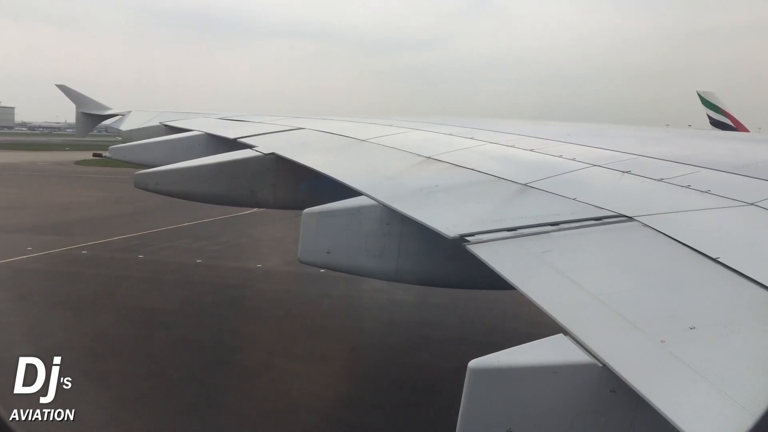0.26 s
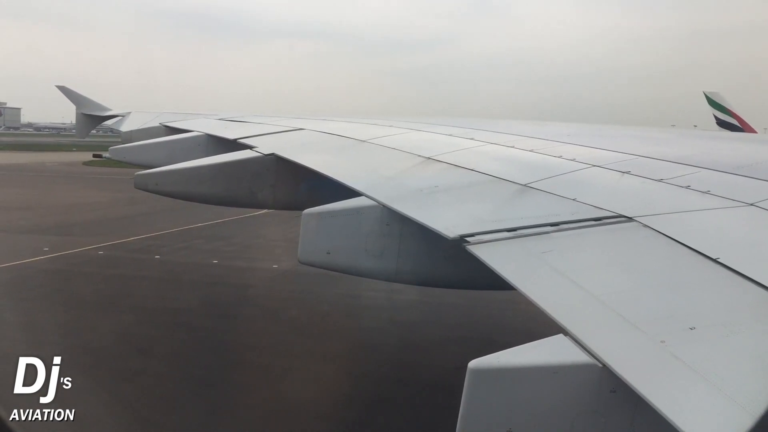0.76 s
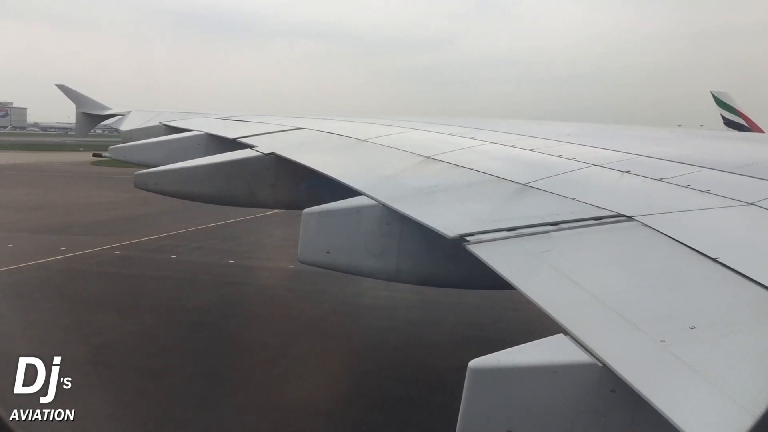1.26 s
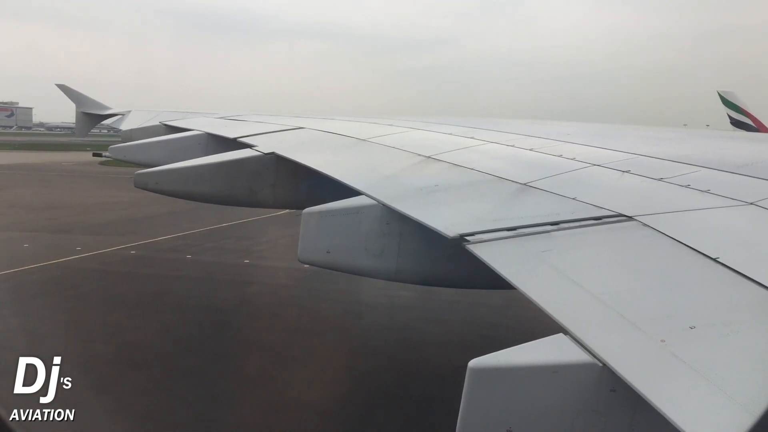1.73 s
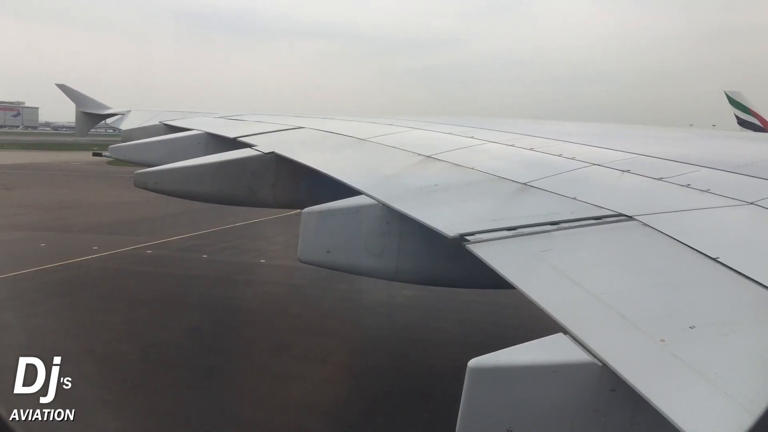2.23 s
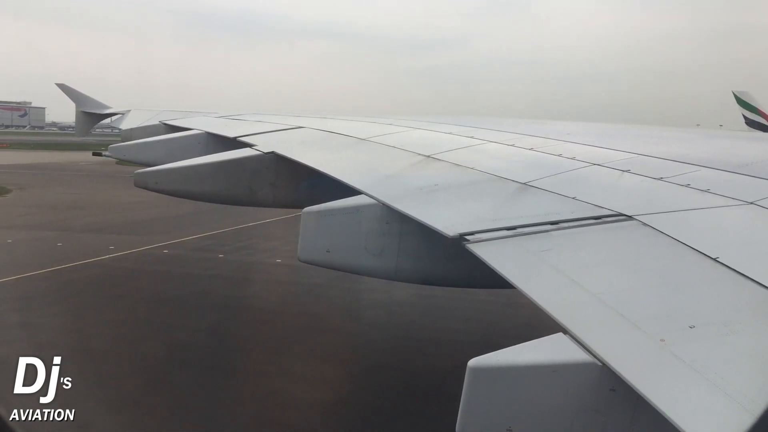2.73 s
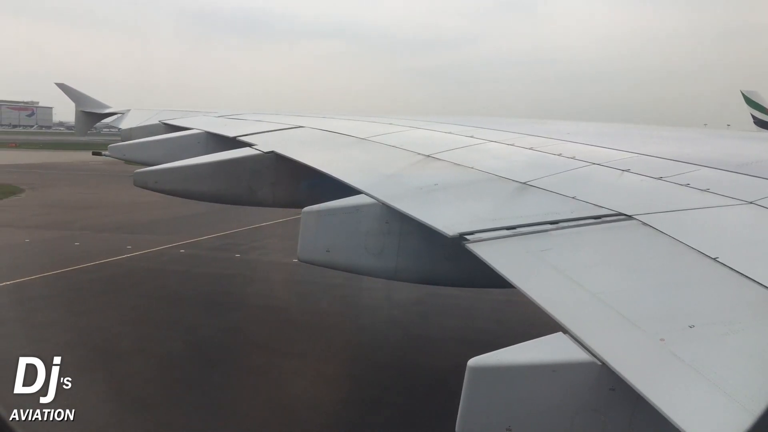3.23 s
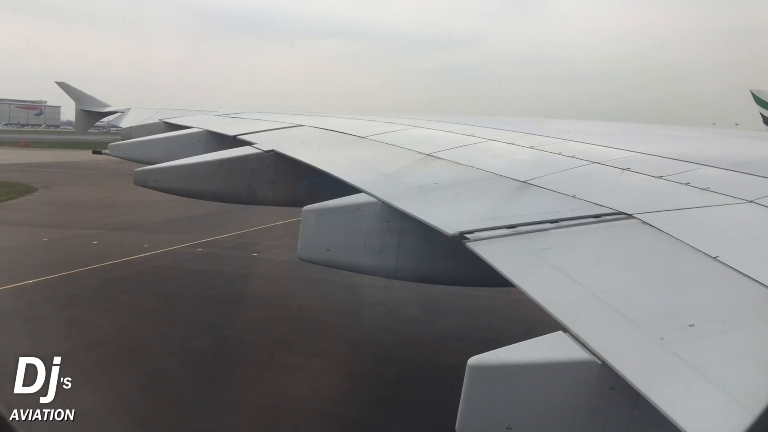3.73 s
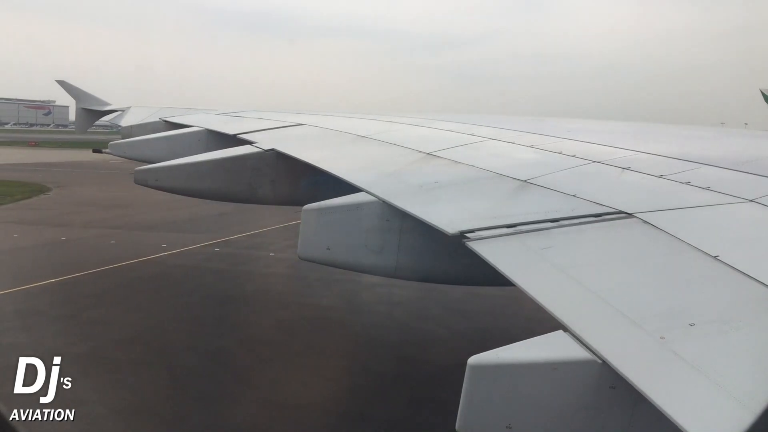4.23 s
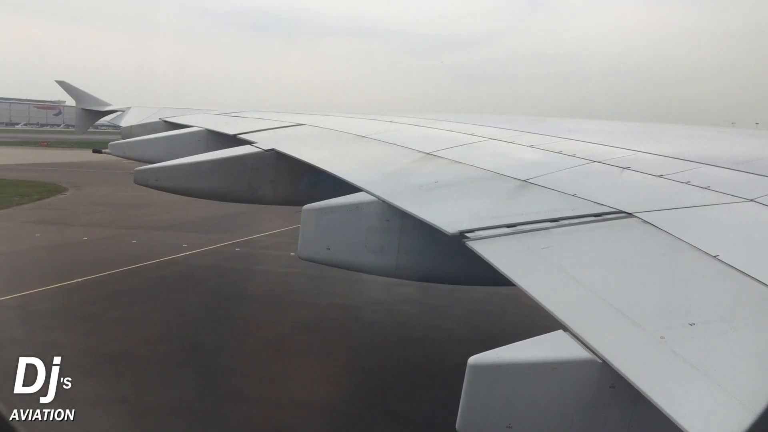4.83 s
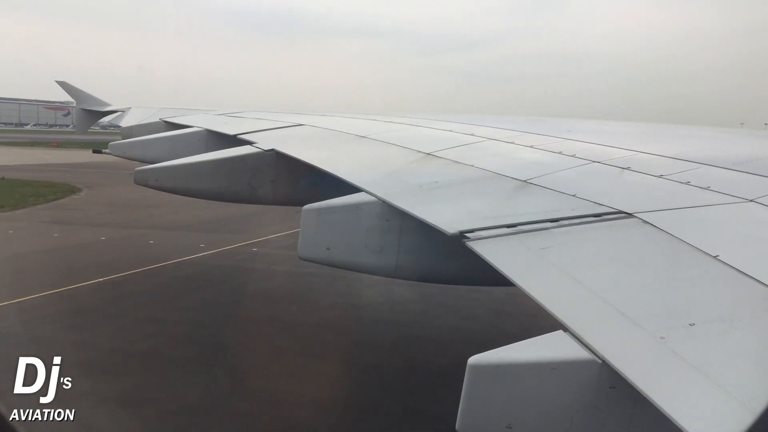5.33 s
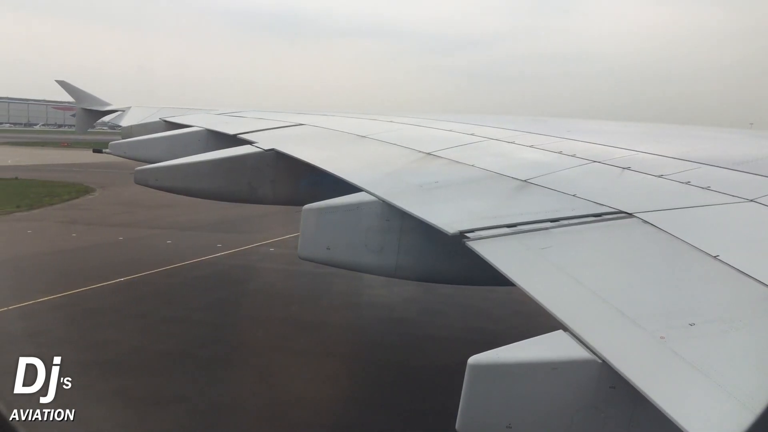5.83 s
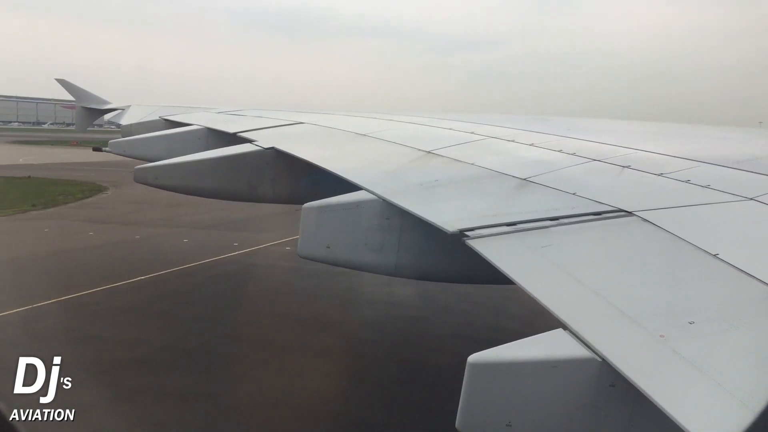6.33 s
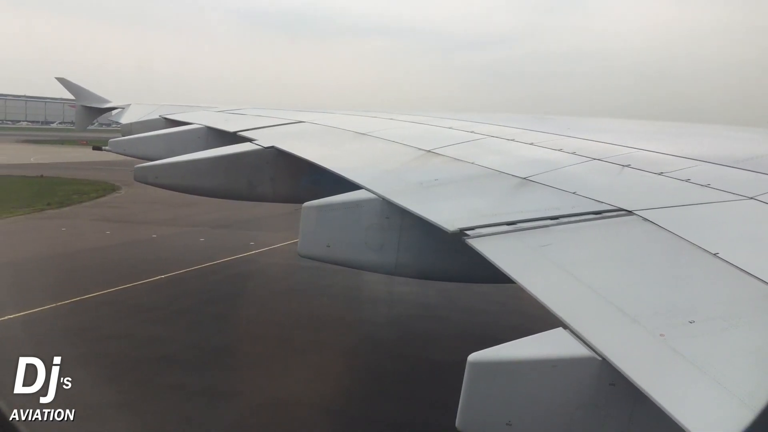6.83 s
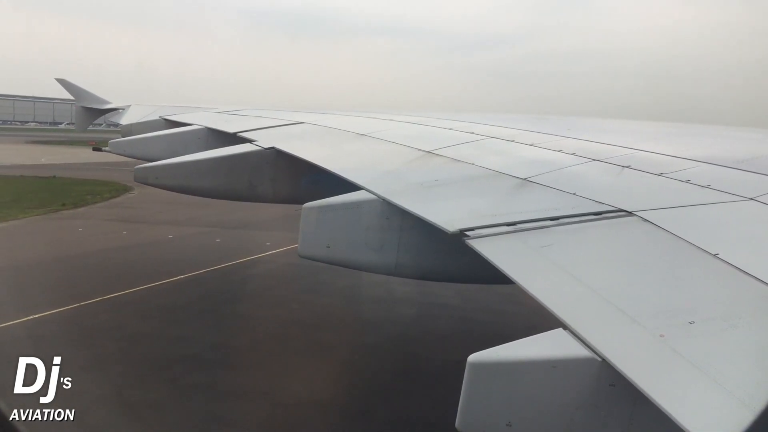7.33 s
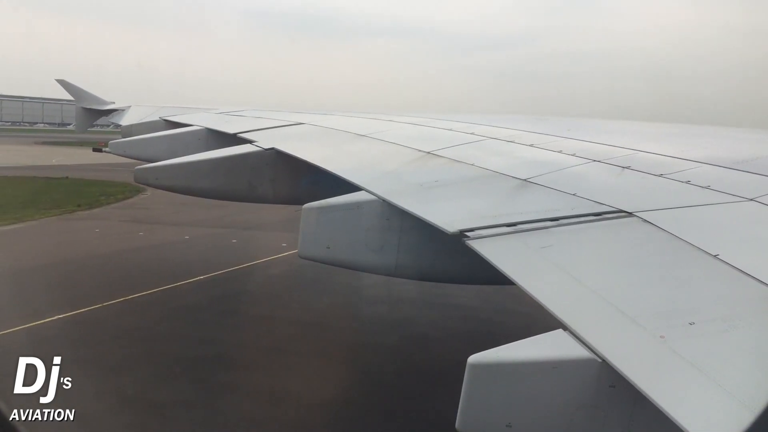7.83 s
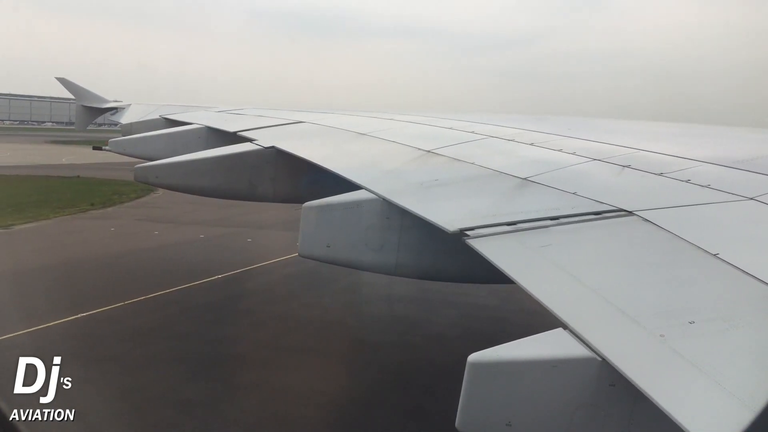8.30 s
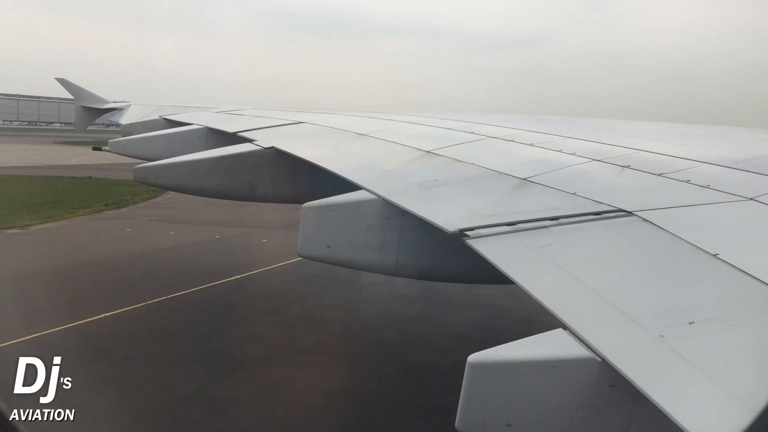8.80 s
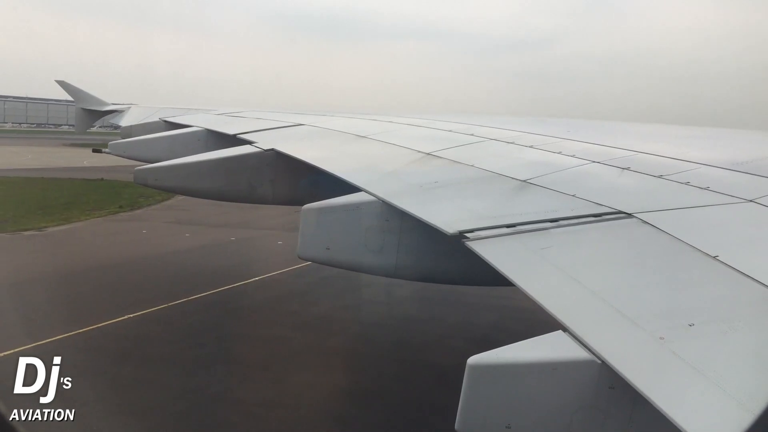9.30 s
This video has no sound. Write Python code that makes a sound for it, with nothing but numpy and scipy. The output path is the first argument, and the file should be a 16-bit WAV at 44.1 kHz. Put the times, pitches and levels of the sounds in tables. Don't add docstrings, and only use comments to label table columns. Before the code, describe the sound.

A continuous airliner cabin bed during taxi: uneven low rumble, soft broadband air rush, faint steady whines with a pump tone coming and going. An early soft bump and close plastic snap give way to sparse tiny ticks. Later one dull, weighty double thud shakes the floor and trim, a faint distant turbine whine climbs, and crackly fumbling of cloth and plastic happens right by the slightly hissy microphone.

```python
import sys
import numpy as np
from scipy import signal
from scipy.fft import rfft, irfft, next_fast_len
from scipy.io import wavfile
from scipy.ndimage import uniform_filter1d, map_coordinates

SR = 44100
rng = np.random.default_rng(int(sys.argv[2]) if len(sys.argv) > 2 else 0)


def master_out(mix):
    frames = np.transpose(np.atleast_2d(mix))
    ceiling = np.clip(frames, -1, 1)
    pcm = np.round(ceiling * 32767).astype(np.int16)
    wavfile.write(sys.argv[1], SR, pcm)


def magnitude_from_level(level_db):
    exponent = np.asarray(level_db, float) / 20
    return 10 ** exponent


N = 421596
T_S = np.arange(N) / SR

# (time [s], level [dB])
ROAD = [(0, 7), (1.3, 7), (2.4, 3.5), (3.2, 3), (3.7, 1.5), (4.4, 1.5), (5.3, -1), (6.2, -0.5), (7.3, -0.5),
        (8.3, -2), (9.56, -2)]


def unit(x):
    return x / np.sqrt(np.mean(x ** 2) + 1e-20)


def curve(rows):
    s, db = np.transpose(rows)
    return np.interp(T_S, s, db)


def wobble(knots_per_s):
    knots = rng.standard_normal(int(N * knots_per_s / SR) + 4)
    return map_coordinates(knots, [np.arange(N) * knots_per_s / SR])


def noise(gain, size=N):
    m = next_fast_len(size)
    spectrum = rfft(rng.standard_normal(m)) * gain(np.fft.rfftfreq(m, 1 / SR))
    return unit(irfft(spectrum, m)[:size])


def shaped(points):
    f, db = np.transpose(points)
    return lambda hz: magnitude_from_level(np.interp(np.log(hz + 1), np.log(f), db, -120, -120))


def peaked(modes):
    return lambda hz: np.sqrt(sum(magnitude_from_level(2 * db) / (1 + (2 * (hz - c) / w) ** 2) ** 2 for c, w, db in modes))


def rippled(colour, spacing_hz, depth_db):
    knots = rng.standard_normal(int(SR / 2 / spacing_hz) + 4)
    return lambda hz: colour(hz) * magnitude_from_level(depth_db * map_coordinates(knots, [hz / spacing_hz]))


def evened(x):
    padded = np.pad(x, (0, next_fast_len(N + SR) - N), 'reflect')
    envelope = np.abs(signal.hilbert(padded)[:N])
    return unit(x / (envelope + 0.46) ** 0.78)


def patchy(x, depth_db):
    z = signal.stft(np.pad(x, (0, SR // 10), 'reflect'), nperseg=512, boundary='even')[2]
    field = uniform_filter1d(rng.standard_normal(z.shape), size=6, axis=0)
    field = uniform_filter1d(field, size=30, axis=1)
    return signal.istft(z * magnitude_from_level(depth_db * unit(field)), nperseg=512)[1][:N]


def spells(rows, rest_db):
    edge_s = .06

    def on(s):
        return np.clip((T_S - s) / edge_s + .5, 0, 1)

    return rest_db + sum((db - rest_db) * (on(s) - on(s + length_s)) for s, length_s, db in rows)


def sine(hz):
    return np.sin(2 * np.pi * np.cumsum(hz) / SR)


def add(out, s, x):
    out[round(s * SR):][:len(x)] += x


def electronics():
    # (frequency [Hz], density [dB per Hz])
    hiss_colour = [(5000, -37), (6500, -11), (7900, -8), (8100, 0.5), (9800, 0), (10700, -5.5), (11400, -1),
                   (12600, 0), (13800, -3), (15100, -2.5), (15700, -2.5), (15750, 6)]
    orders = [50, 56, 57, 58, 60, 62, 63, 68, 70, 71, 74, 75, 77, 78, 79, 81]
    strong_db = {59: -95, 61: -98, 67: -100, 69: -97, 72: -98, 80: -101}
    hiss_db, buzz_hz, weak_db, scatter_db = -82.5, 192.81, -104, 2.7

    comb_db = {k: weak_db + scatter_db * rng.standard_normal() for k in orders} | strong_db
    buzz = sum(magnitude_from_level(db) * np.sin(2 * np.pi * (k * buzz_hz * T_S + rng.random())) for k, db in comb_db.items())
    hiss = magnitude_from_level(hiss_db + .4 * wobble(3.6)) * noise(shaped(hiss_colour))
    return hiss + buzz * magnitude_from_level(4 + wobble(2))


def distant():
    # (start [s], length [s], level [dB rms])
    sing = [
        (0.2, 3.6, -98),
        (4.1, .4, -95),
        (5.2, .3, -96),
        (5.75, .45, -90),
        (7.7, .9, -96),
        (9.25, .3, -94),
    ]
    start_s, end_s, glide_db, sing_hz = 7.15, 8.45, -95, 6245

    glide_hz = np.interp(T_S, (start_s, end_s), (4640, 5400))
    glide_level_db = spells([(start_s, end_s - start_s, glide_db)], -130) + 3 * wobble(7)
    glide = magnitude_from_level(glide_level_db) * sine(glide_hz)
    return glide + magnitude_from_level(spells(sing, -110) + 3) * sine(sing_hz + 6 * wobble(6))


def machinery():
    # (time [s], level [dB rms])
    spool = [(0, -62), (.4, -58), (1.2, -60), (3.2, -57.5), (3.5, -54.5), (4.8, -54), (6.7, -55),
             (7.3, -56.5), (8.5, -59.5), (9.56, -59.5)]
    # (start [s], length [s], level [dB rms])
    pump = [(.2, .5, -68), (0.947, 0.39, -66.5), (1.6, 0.49, -66.5), (2.85, 0.55, -63.5),
            (3.703, 1.03, -66.5), (5.1, 0.42, -69.5), (5.9, .4, -70), (6.5, .3, -70), (7.2, .4, -76),
            (7.85, 0.44, -65.5), (8.695, 0.44, -68), (9.3, .4, -67)]
    # (start [s], length [s], level [dB rms])
    whistle = [(1.15, 0.65, -86), (1.75, .5, -85.5), (3.3, .4, -88), (4.56, .12, -83), (4.85, 0.22, -82),
               (5.12, .18, -80), (6.15, .45, -86), (8.1, .35, -88), (8.75, .55, -86), (9.45, .2, -85)]
    tone_hz = [799.7, 1062, 3222.5, 4527.5]
    whine_hz = [400, 818, 1005, 1118, 1197.5, 1225, 1263.5, 1330, 1405, 1537, 1599, 1828, 2001, 2263, 3001,
                3090, 3158]
    # (level [dB rms], width [Hz])
    whines = [(-68.5, 12), (-71, 6), (-70.5, 12), (-67, 5), (-63, 2.8), (-69, 15), (-62, 3.4), (-74, 5),
              (-61, 14), (-59.5, 6), (-68.5, 6), (-69, 6.6), (-67.5, 19.5), (-71, 14.05), (-84, 12),
              (-74, 6), (-72.5, 6.6)]
    converter_db, converter_follows_spool, pump_rest_db, whistle_rest_db = -66, 0.27, -77.5, -95

    out = np.zeros(N)
    spool_db = curve(spool)
    converter_level_db = converter_db + converter_follows_spool * (spool_db - spool_db.mean()) + 1.1 * wobble(3)
    levels_db = converter_level_db, spool_db, spells(pump, pump_rest_db), spells(whistle, whistle_rest_db)
    for hz, db in zip(tone_hz, levels_db):
        drift = 1 + 1.3e-3 * wobble(9)
        out += np.sqrt(2) * magnitude_from_level(db + 1.5 + 0.44 * wobble(8)) * sine(hz * drift)
    for hz, (db, width_hz) in zip(whine_hz, whines):
        steady = sine(hz + 0.402 * width_hz * wobble(5))
        rough = noise(peaked([(hz, width_hz, 0)]))
        out += magnitude_from_level(db + 0.85 * wobble(3.1)) * (0.85 * steady + 0.78 * rough)
    return out


def cloth():
    # (time [s], peak [dB], dullness, low over high [dB], t60 [s])
    brushes = [(0.4155, -40, 8, 0.045), (0.42, -46, 18, 0.04), (0.6833, -57.5, 2, 0.052),
               (1.669, -57, 20, 0.08), (1.678, -64, -9, 0.03), (1.687, -60, 2, 0.06),
               (1.8054, -64, 5, 0.08), (3.7494, -70, -5, 0.07), (4.4248, -62, 18, 0.07),
               (4.635, -71, -16, 0.12), (5.0868, -60, -5, 0.07), (5.091, -50, -6, 0.085),
               (5.5094, -63, 14, 0.07), (7.5717, -62, 7, 0.076), (7.581, -68, 3, 0.07),
               (8.929, -58, 8, 0.06), (8.9435, -41.5, 6, 0.055), (8.964, -51, 2, 0.07),
               (9.012, -62, 22, 0.049), (9.0606, -62, -1, 0.09), (9.1, -56, 4, 0.066),
               (9.131, -53, 20, 0.12), (9.142, -43, 4, 0.08), (9.162, -48, 2, 0.06), (9.174, -43, 6, 0.07),
               (9.216, -61, 4, 0.06), (9.3506, -63, 3, 0.06), (9.411, -63, 16, 0.07)]
    bands = [[(1200, -36), (2200, -0.5), (2600, 4), (4000, -7), (5500, -2.5), (6800, -8.5), (7800, -36)],
             [(6300, -20.5), (7500, -8.5), (9500, -4), (10800, -6.5), (11800, -54)],
             [(10300, -33), (11400, 2), (13500, -5), (14800, -7.5), (15700, -5), (16000, -48.5)]]

    out, t = np.zeros(N + SR), np.arange(SR // 4) / SR
    for s, db, dull_db, t60_s in brushes:
        mix_db = dull_db / 2, -.4 * dull_db + 0.5, -dull_db / 2
        puff = sum(magnitude_from_level(level_db) * noise(rippled(shaped(band), 450, depth_db=4.5), size=len(t))
                   for level_db, band in zip(mix_db, bands))
        slips = rng.standard_normal(len(t) // 90 + 3)
        grain = magnitude_from_level(2.8 * map_coordinates(slips, [np.arange(len(t)) / 90]))
        fade = magnitude_from_level(-60 * t / (0.7 * t60_s)) + magnitude_from_level(-12 - 60 * t / (2.2 * t60_s))
        attack = (1 - np.exp(-t / 0.0021)) ** 2
        add(out, s - .004, magnitude_from_level(db - 9.5) * puff * grain * fade * attack)
    return out[:N]


def plastic():
    # (time [s], level [dB],
    # frequency [Hz], width [Hz])
    ticks = [(.418, -46, 2250, 1200), (.75, -71, 6000, 2500), (.95, -62, 4500, 2000),
             (1.666, -39, 1450, 250), (1.669, -37, 1620, 300), (1.674, -40, 1700, 200),
             (2.02, -71, 11000, 6000), (2.02, -65, 5500, 2500), (4.426, -60, 4520, 300),
             (5.09, -66, 5200, 200), (5.093, -68, 6350, 300), (7.569, -65, 6200, 300),
             (6.607, -63, 5000, 2500), (7.571, -65, 9200, 500), (7.573, -69, 10400, 500),
             (7.57, -71, 12600, 1200), (3.752, -72, 11400, 300), (7.575, -68, 5400, 300),
             (8.4, -57, 3800, 500), (8.963, -59, 7100, 400), (9.128, -48, 3300, 1200),
             (9.14, -57, 15550, 350), (9.17, -55, 5350, 346), (9.172, -60, 15550, 350),
             (9.01, -62, 4300, 900), (8.943, -56, 5900, 600), (5.081, -64, 11500, 3000),
             (5.088, -61, 5000, 3000), (4.422, -68, 5800, 2000), (9.19, -63, 5000, 3000),
             (9.407, -61, 4200, 600)]
    # (time [s], level [dB], frequency [Hz], width [Hz])
    creaks = [(1.645, -75, 11000, 5000), (3.63, -71, 5500, 3000), (8.985, -66, 5000, 4000),
              (9.07, -70, 6000, 6000), (1.635, -66, 4500, 2000), (7.31, -74, 6000, 150),
              (7.78, -82, 11000, 200)]
    # (time [s], level [dB], frequency [Hz], width [Hz])
    snaps = [(.414, -52, 9000, 2500), (.418, -50, 12000, 2500), (.415, -47, 5000, 3000),
             (.419, -38, 2100, 900), (.432, -56, 5200, 1500), (.432, -60, 9000, 1500),
             (1.655, -62, 5000, 3000), (1.669, -54, 4200, 2500), (1.669, -60, 9000, 1000),
             (1.676, -58, 4500, 3000), (1.676, -56, 9400, 1000), (1.676, -57, 11500, 2500),
             (1.685, -54, 9200, 800), (1.685, -55, 11200, 800), (1.685, -59, 13200, 1000),
             (1.685, -58, 15400, 500), (1.685, -50, 3200, 1200), (1.687, -61, 6800, 1500),
             (4.424, -55, 3700, 1200), (4.577, -59, 4530, 200), (6.608, -56, 3600, 1200),
             (3.751, -67, 10000, 600), (7.581, -58, 10400, 600), (7.579, -58, 9200, 500),
             (9.352, -63, 9500, 6000), (8.946, -44, 2300, 1200), (9.15, -45, 2400, 1200),
             (9.172, -46, 2500, 1500), (4.632, -60, 11800, 1500), (4.73, -72, 11000, 5000),
             (5.088, -54, 12000, 3000), (8.941, -44, 6000, 900), (8.945, -52, 11800, 900),
             (8.947, -51, 8000, 1000), (8.948, -50, 5000, 1500), (8.943, -46, 3200, 800),
             (8.963, -46, 3200, 700), (8.966, -56, 14500, 1500), (8.994, -52, 3200, 1200),
             (9.102, -57, 5300, 1500), (9.102, -62, 12000, 3000), (9.13, -44, 3200, 700),
             (9.136, -46, 2900, 900), (9.14, -46, 5450, 800), (9.141, -44, 2800, 1000),
             (9.148, -46, 5400, 600), (9.147, -54, 9500, 1500), (9.162, -50, 5800, 1200),
             (9.163, -53, 10500, 2000), (9.171, -46, 5500, 1200), (9.171, -53, 9500, 1500),
             (9.176, -46, 5300, 500), (9.184, -52, 5300, 600), (9.208, -56, 5500, 1500),
             (9.22, -55, 5500, 1200)]

    out, t = np.zeros(N + SR), np.arange(SR // 4) / SR
    for rows, t60_s in (ticks, 0.087), (creaks, .32), (snaps, .024):
        for s, db, hz, width_hz in rows:
            note = noise(peaked([(hz, width_hz, 0)]), size=len(t))
            add(out, s - .002, magnitude_from_level(db) * note * magnitude_from_level(-60 * t / t60_s) * (1 - np.exp(-t / 0.0018)))
    return out[:N]


def gear():
    # (time [s], peak [dB], frequency [Hz], length [s], rattle [dB])
    blows = [(0.0745, -19.5, 204, 0.012, -35), (.0826, -18, 153, 0.018, -33),
             (6.7749, -12.5, 200, 0.021, -17), (6.7753, -22, 380, .015, -30), (6.7795, -31, 560, .014, -30),
             (6.772, -37, 1420, .016, -40), (6.78, -42, 820, .025, -40), (6.779, -39, 1260, .014, -40),
             (6.808, -26, 390, .014, -29), (6.7915, -21, 200, 0.018, -19), (6.8, -29, 330, .014, -30),
             (6.818, -39, 580, .03, -30), (6.822, -34, 400, .015, -30), (6.846, -33, 430, .016, -30),
             (6.895, -33, 190, .022, -30), (6.8043, -15.5, 177, 0.04, -18), (6.848, -25, 188, 0.023, -19),
             (6.872, -33, 200, 0.026, -14)]
    # (frequency [Hz], width [Hz], level [dB])
    panels = [(270, 41, -5.5), (373, 106, 3), (452, 45, 0.5), (600, 73, -6.5), (798, 180, -15),
              (1110, 230, -20.5), (1450, 500, -14)]

    out, t = np.zeros(N + SR), np.arange(SR // 3) / SR
    for s, db, hz, length_s, rattle_db in blows:
        swing = np.sin(np.pi * np.clip(t / length_s, 0, 1)) ** 2.2 * np.sin(2 * np.pi * hz * t)
        rattle = noise(peaked(panels), size=len(t)) * magnitude_from_level(-60 * t / 0.2) * np.clip(t / 0.002, 0, 1) ** 2
        add(out, s, magnitude_from_level(db) * (swing + magnitude_from_level(rattle_db) * rattle))
    return out[:N]


def vents():
    # (frequency [Hz], density [dB per Hz])
    duct = [(200, -40.5), (280, -4.5), (430, -9), (615, -6.5), (700, -18.5), (760, -12), (875, -18.5),
            (950, -11.5), (1100, -41.5)]
    nozzle = [(700, -51.5), (870, -29), (1000, -4.5), (1070, -10), (1220, 0), (1300, -4.5), (1400, 0.5),
              (1540, 0), (1960, -3.5), (2110, -6.5), (2390, -7), (2560, -11.5), (2650, -38), (3200, -51.5)]
    edge = [(2250, -30), (2620, -2.5), (2930, -3), (3050, -1), (3250, 1), (3360, -5), (3500, -6.5),
            (3900, -58.5)]
    far = [(3200, -22), (3600, 4), (4000, 0), (4550, -2), (4950, -9.5), (5300, -6.5), (6200, -7.5),
           (6900, -12), (7800, -17), (9000, -38)]
    levels_db = [-53, -47.5, -62, -72.5]
    follows = [0.18, -0.072, -0.09, 0.086]
    patches_db = [.5, .5, 1, 1.9]
    valves_db = [-2.5, 0, -2, -2.5]
    valve_s, valve_takes_s = 4.25, .3

    out, road_db = np.zeros(N), curve(ROAD)
    shut = np.clip((T_S - valve_s) / valve_takes_s + .5, 0, 1)
    layers = zip(levels_db, follows, valves_db, patches_db, (duct, nozzle, edge, far))
    for db, follow, valve_db, patch_db, colour in layers:
        level_db = db + follow * road_db + valve_db * shut + 0.7 * wobble(6.8)
        rush = noise(rippled(shaped(colour), 31.78, depth_db=2.0))
        out += magnitude_from_level(level_db) * patchy(rush, patch_db)
    return out


def rolling():
    # (frequency [Hz], width [Hz], level [dB])
    deep = [(53.4, 11, -6), (76.6, 34.5, -4)]
    floor = [(103.5, 16.6, 0)]
    walls = [(157.7, 13.1, 3.5), (177.6, 15, -2), (195, 9.2, -6)]
    # (frequency [Hz], density [dB per Hz])
    broad = [(22, -59.5), (32, -18.5), (45, 2), (90, -8), (130, 1), (250, -4.5), (270, -10), (330, -19),
             (500, -30), (700, -98)]
    # (time [s], deep [dB], floor [dB], wall [dB])
    bumps = [(.02, 3, 3.5, -5), (.29, -8, 6.5, -3), (.41, 7, -4.5, 2.5), (.58, 5, 12.5, 0),
             (1.65, 1, 0.5, 6.5), (1.87, -5, 6, 1.5), (3.1, 2, 7, 0), (4.34, 4, -5, -7),
             (5.03, 9.5, -9, -9), (5.3, 2, -1, -22), (5.62, 6, 6.5, 5), (7.32, -9, 1, -5),
             (7.55, 3, 6, 7.5), (8.7, -2.5, 3, -1.5), (8.9, 0, -6, 6.5), (4.75, -1, -4, 6),
             (9.19, -6, 9.5, 4)]
    hull_db = [-44.5, -47, -44.5, -52]
    follows = [0.61, 1.46, 0.22, 0.41]
    swings_db, swings_per_s = [1.6, 1.9, 2.1, 0.99], 5.5
    bump_s, beat_s, beat_top_s, beat_db = 0.076, 2.12, 4, 1

    road_db = curve(ROAD)
    deep_db, floor_db, wall_db, broad_db = [db + follow * road_db + swing_db * wobble(swings_per_s)
                                            for db, follow, swing_db in zip(hull_db, follows, swings_db)]
    bumps_db = sum(np.outer(db, np.exp(-((T_S - s) / bump_s) ** 2)) for s, *db in bumps)
    throb_db = beat_db * np.cos(2 * np.pi * (T_S - beat_top_s) / beat_s)
    out = magnitude_from_level(deep_db + bumps_db[0]) * evened(noise(peaked(deep)))
    out += magnitude_from_level(floor_db + bumps_db[1]) * evened(noise(peaked(floor)))
    out += magnitude_from_level(wall_db + bumps_db[2] + throb_db) * evened(noise(peaked(walls)))
    return out + magnitude_from_level(broad_db + 10.0 + 1.23 * wobble(9)) * noise(shaped(broad))


def scene():
    background = electronics() + distant() + machinery()
    return (background + cloth() + plastic() + gear() + vents() + rolling())[None]


def top_cut(x):
    return signal.sosfilt(signal.butter(12, 15730, fs=SR, output="sos"), x)


def record(dry):
    top_hz, bass_hz, release_s = 15750, 27, .18
    over = np.clip(uniform_filter1d(np.abs(dry), size=900) - .035, 0, None)
    keep = np.exp(-1 / (release_s * SR))
    duck_db = -260 * signal.lfilter([1 - keep], [1, -keep], over)
    m = next_fast_len(N + SR)
    hz = np.fft.rfftfreq(m, 1 / SR)
    capsule = (hz < top_hz) / (1 + (bass_hz / (hz + 1)) ** 4)
    padded = np.pad(dry * magnitude_from_level(duck_db), ((0, 0), (0, m - N)), 'reflect')
    mix = irfft(rfft(padded) * capsule, m)[:, :N]
    mix[:, -350:] *= np.hanning(700)[350:]
    return top_cut(mix)


dry = scene()
out = record(dry)
master_out(out)
```